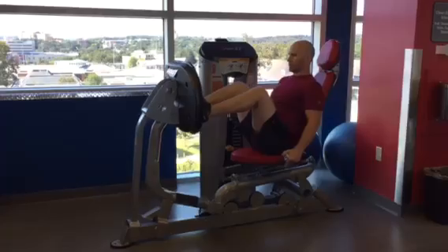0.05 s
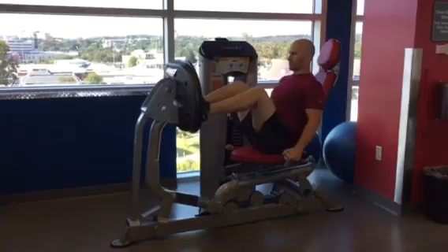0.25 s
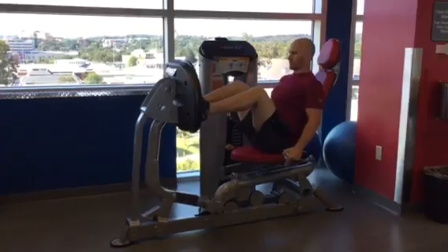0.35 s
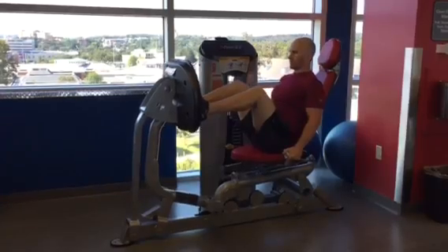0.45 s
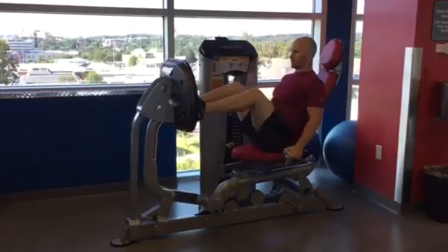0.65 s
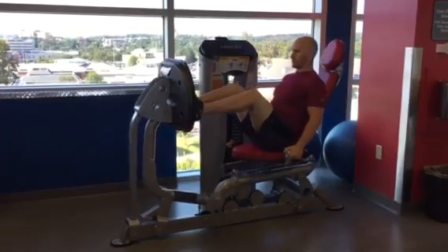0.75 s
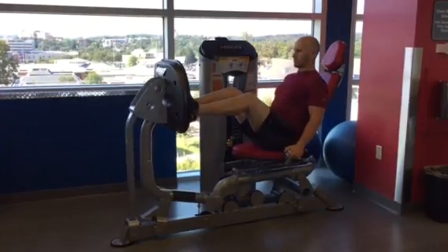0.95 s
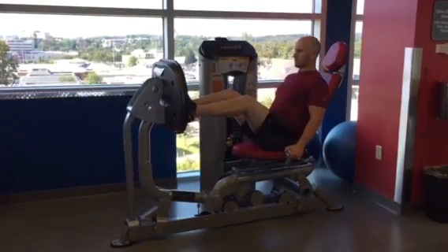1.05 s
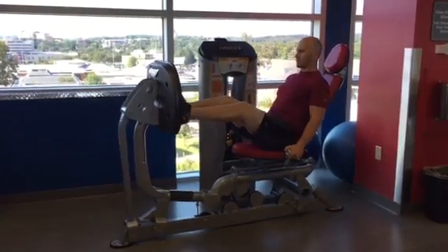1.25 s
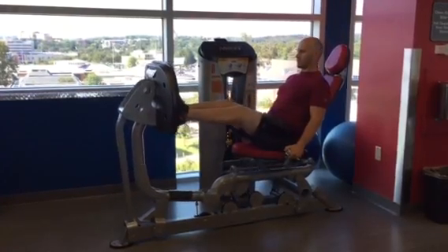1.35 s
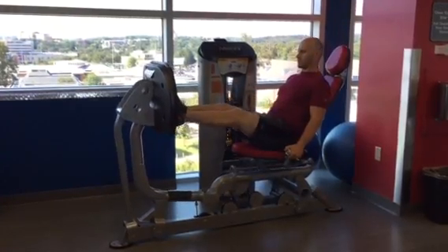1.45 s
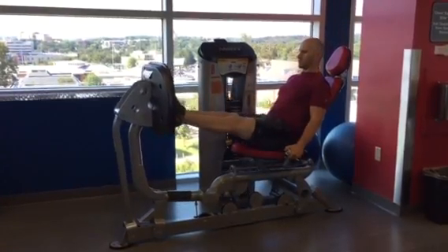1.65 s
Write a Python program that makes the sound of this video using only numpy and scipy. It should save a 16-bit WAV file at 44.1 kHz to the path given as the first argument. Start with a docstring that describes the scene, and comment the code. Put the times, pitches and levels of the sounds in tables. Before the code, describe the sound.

A gym weight stack clanks once, with ringing steel and low thuds over ventilation rumble.

```python
"""Ventilation rumbles in a hard-walled room. A few metres away, the steel plates of a gym weight stack
clank together once: a light touch, then the main blow, which sets the plates ringing.
The load thuds on the machine's frame and rebounds, mostly more softly each time.
The linkage knocks faintly among the rebounds, and once more near the end."""
import sys
import numpy as np
from scipy import signal
from scipy.fft import irfft
from scipy.io import wavfile

SR = 44100
rng = np.random.default_rng(int(sys.argv[2]) if len(sys.argv) > 2 else 0)


def put_to_file(sound):
    """Save the sound as 16-bit audio at rate SR, in the file named by the first command-line argument."""
    columns = np.atleast_2d(sound).T  # one column per channel
    safe = np.clip(columns, -1, 1)
    whole_steps = np.round(safe * 32767)
    wavfile.write(sys.argv[1], SR, whole_steps.astype(np.int16))


N = 74970
T = np.arange(N) / SR


def amp(db):
    """Turns decibels into a number to multiply a sound by."""
    return 10 ** (np.asarray(db) / 20)


def read(points, hz):
    """Looks up a value between a table's rows, with every octave equally wide."""
    f, value = np.transpose(points)
    return np.interp(np.log(hz + 1), np.log(f), value)


def delayed(x, s):
    """Starts a sound s seconds in."""
    return np.concatenate([np.zeros(max(round(s * SR), 0)), x])[:N]


def rise(seconds):
    """Climbs smoothly from 0 to 1."""
    return np.sin(np.pi / 2 * np.minimum(T / seconds, 1)) ** 2


def decay(fade_s):
    """Dies away. A fade time is how long a sound takes to fall by 60 dB."""
    return np.exp(-np.log(1000) * T / fade_s)


def muffle(x, cutoff_hz):
    """Dulls a sound by turning down what lies above the cutoff."""
    return signal.lfilter(*signal.butter(2, min(cutoff_hz, SR / 2 - 1), fs=SR), x)


def noise(colour):
    """Noise of a standard strength; its colour is its balance of low and high frequencies."""
    hz = np.fft.rfftfreq(N, 1 / SR)
    phases = np.exp(2j * np.pi * rng.random(len(hz)))
    x = irfft(amp(read(colour, hz)) * phases, N)
    return x / x.std()


def room_tail(colour):
    """Dense ringing that dies away in the room, the highs soonest."""
    # how long the room rings (frequency [Hz], fade time [s])
    room_fades = [(80, 0.72), (300, 1), (1000, 0.51), (2500, .45), (5000, 0.35), (8000, .35), (12000, 0.27),
                  (16000, .23)]
    hz, t, bands = signal.stft(noise(colour), SR, nperseg=512)
    bands = bands * 10 ** (-3 * t / read(room_fades, hz)[:, None])
    return signal.istft(bands, SR, nperseg=512)[1][:N]


def clean_ring(tones):
    """The fading tones of a struck object, heard directly."""
    return sum(amp(db) * np.sin(2 * np.pi * hz * T) * decay(fade_s) for hz, db, fade_s in tones)


def wavering_ring(tones, depth, flutter_hz):
    """Fading tones that each waver as reflections from the walls mix in."""
    out, f = np.zeros(N), np.fft.fftfreq(N, 1 / SR)
    for hz, db, fade_s in tones:
        # a slow random wobble of level and phase
        scatter = np.fft.ifft(np.exp(2j * np.pi * rng.random(N) - (f / flutter_hz) ** 2))
        waver = (1 + depth * scatter / scatter.std()) / np.hypot(1, depth)
        out += amp(db) * decay(fade_s) * (waver * np.exp(2j * np.pi * hz * T)).imag
    return out


def ventilation():
    """Moving air makes a steady, low rumble."""
    # colour of the rumble (frequency [Hz], relative level [dB])
    air_colour = [(20, -34), (35, -22), (55, -5), (85, -3), (125, -0.5), (185, -2), (255, -7), (310, -14.5),
                  (410, -18.5), (510, -30.5), (620, -26), (780, -31.5), (1300, -33.5), (2350, -38.5),
                  (3300, -43), (7000, -50), (11000, -54.5), (16000, -56.5)]
    return amp(-47) * noise(air_colour)


def linkage():
    """Soft, dull knocks as the machine's connecting parts take up the load."""
    # knocks of the linkage (time [s], level [dB], cutoff [Hz])
    knocks = [(0.387, -48.5, 4900), (1.666, -55.5, 1100)]
    # colour of a knock (frequency [Hz], relative level [dB])
    knock_colour = [(100, -21), (400, 6), (900, -2.5), (1500, 6), (2600, -11.5), (4000, -13), (8000, -27),
                    (16000, -28)]
    out = np.zeros(N)
    shape = rise(seconds=0.004) * decay(fade_s=0.29)
    for s, db, cutoff_hz in knocks:
        knock = muffle(noise(knock_colour), cutoff_hz) * shape
        out += amp(db) * delayed(knock, s)
    return out


def frame():
    """Each blow of the load punches the frame and makes its low tones swell; the room booms."""
    # blows on the frame (time [s], relative level [dB], cutoff [Hz])
    thuds = [(.214, -0.5, 750), (.296, -5, 116.5), (.348, -7, 97), (0.691, -20, 202), (1.036, -17.5, 149)]
    # direct push of the frame (frequency [Hz], relative level [dB], fade time [s])
    punch_tones = [(81.1, -18.5, 0.18), (162.7, -15, 0.21)]
    # the frame's own tones (frequency [Hz], relative level [dB], fade time [s])
    frame_tones = [(57.6, -8.5, 0.54), (85.2, 1.5, 0.63), (119.3, -4.5, 0.95), (170.8, -8.5, 0.27),
                   (204.2, -8.5, 1), (322, -11, 0.77), (346.7, -8.5, 0.81), (402, -6.5, 0.33),
                   (471.6, -8.5, 0.62), (604, -17, 0.87), (679, -12, 0.56), (797.6, -5, 0.44)]
    # the room's answer to a thud (frequency [Hz], relative level [dB])
    boom_colour = [(30, -34), (70, -3.5), (170, -6), (260, -3.5), (400, -6), (800, -8), (1600, -28),
                   (5000, -60)]
    out = np.zeros(N)
    punch = clean_ring(punch_tones) * rise(seconds=0.038)
    for s, db, cutoff_hz in thuds:
        body = amp(-27.5) * wavering_ring(frame_tones, depth=0.51, flutter_hz=17) * rise(seconds=0.056)
        boom = amp(-35) * room_tail(boom_colour) * rise(seconds=0.036)
        out += amp(db) * delayed(muffle(punch + body + boom, cutoff_hz), s)
    return out


def plates():
    """Steel hits steel: each contact cracks, pings and clangs; the hardest leaves the plates ringing."""
    # plate contacts (time [s], relative level [dB], extra level for the ping [dB], cutoff [Hz])
    contacts = [(0.1992, -19.5, -5, 6600), (.2066, -15.5, -9, 14000), (.208, -3.5, -6, 19000),
                (.2108, -7.5, 6, 9760), (.2178, -10, 8.5, 14000)]
    # sharp crack of a contact (frequency [Hz], relative level [dB])
    crack_colour = [(300, -36), (700, -15), (1400, 1), (3000, -2), (6000, -8), (9500, -6), (12500, -0.5),
                    (16000, -10)]
    # direct ring of a contact (frequency [Hz], relative level [dB], fade time [s])
    ping_tones = [(1021, -37, 0.087), (1347, -27.5, 0.043), (3092, -25, 0.039), (3157, -33.5, 0.036)]
    # dense ringing of the stack in the room (frequency [Hz], relative level [dB])
    clang_colour = [(200, -3), (600, -12.5), (1000, 2), (1400, -1), (2400, -11), (2850, -10), (3110, 1),
                    (3400, -13), (4200, -13), (5500, -16.5), (6200, -10), (6570, -7.5), (7200, -9.5),
                    (8200, -16.5), (9600, -7), (10400, -17.5), (12500, -2.5), (14000, -13), (16000, -18)]
    # the plates' own tones (frequency [Hz], relative level [dB], fade time [s])
    plate_tones = [(987, -9, 0.56), (1015, -18, 0.72), (1082, -10.5, 0.68), (1152, -7, .45),
                   (1372, -6, 0.2), (2075, -18.5, 0.82), (2777, -15.5, .33), (3090, -12, .4),
                   (3087, -5, 0.56), (3077, -10.5, 0.46), (3188, -8.5, 0.38), (3122, 0, 0.18),
                   (3764, -8, 0.29), (4790, -17, 0.48), (6480, -8.5, 0.37), (6535, -17.5, 0.53),
                   (7135, -16, 0.38), (10550, -14, .27), (11597, -11, .21), (11657, -11, .25)]
    out = np.zeros(N)
    ping = clean_ring(ping_tones) * rise(seconds=0.003)
    for s, db, ping_db, cutoff_hz in contacts:
        crack = amp(-22) * noise(crack_colour) * decay(fade_s=0.008)
        clang = amp(-32) * room_tail(clang_colour) * rise(seconds=0.0015)
        out += amp(db) * delayed(muffle(crack + amp(ping_db) * ping + clang, cutoff_hz), s)
    main_blow_s = max(contacts, key=lambda row: row[1])[0]
    ringing = wavering_ring(plate_tones, depth=1.22, flutter_hz=27.6) * rise(seconds=0.01)
    return out + amp(-35) * delayed(ringing, main_blow_s)


def scene():
    """The ventilation and the machine together, in one channel."""
    return (ventilation() + linkage() + frame() + plates())[None]


def record(dry):
    """Fades in quickly after a moment of silence and removes the very highest treble."""
    start_s, cutoff_hz = 0.032, 15800
    faded_in = dry * delayed(rise(seconds=0.001), start_s)
    treble_cut = signal.firwin(511, cutoff_hz, window=("kaiser", 9), fs=SR)
    return signal.oaconvolve(faded_in, treble_cut[None], "same")


dry = scene()
out = record(dry)
put_to_file(out)
```